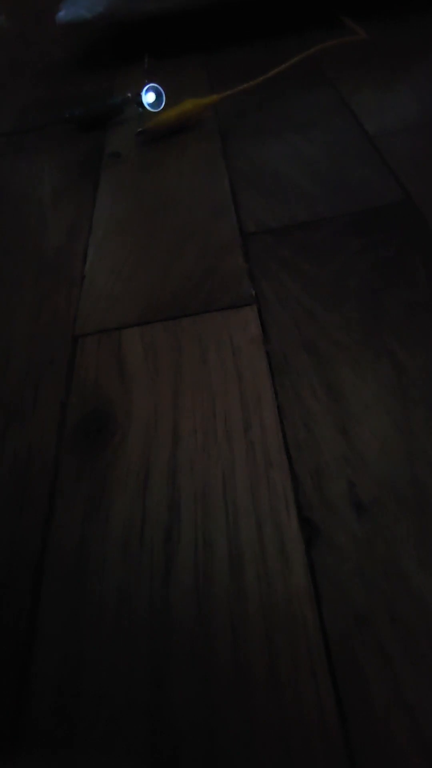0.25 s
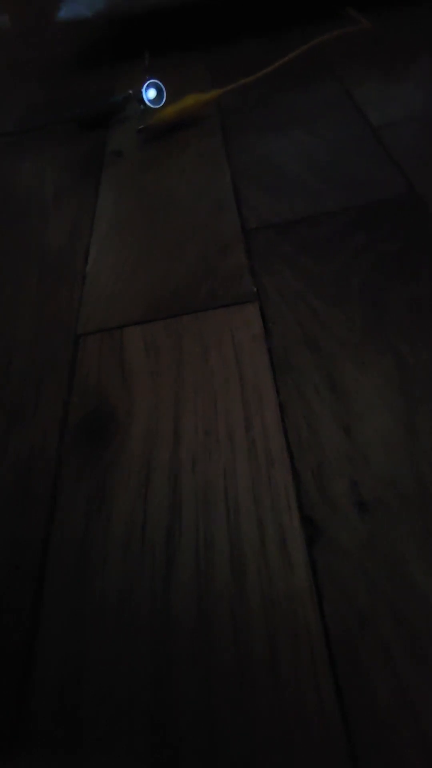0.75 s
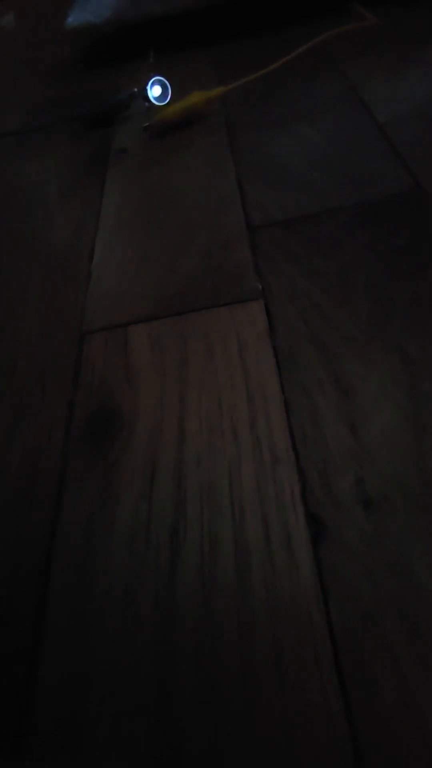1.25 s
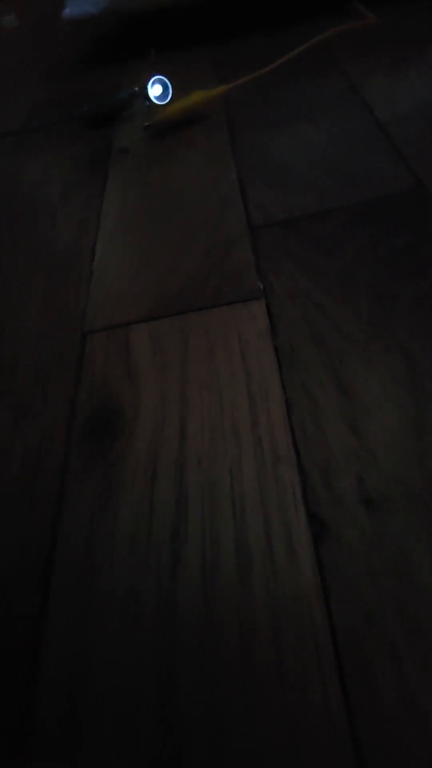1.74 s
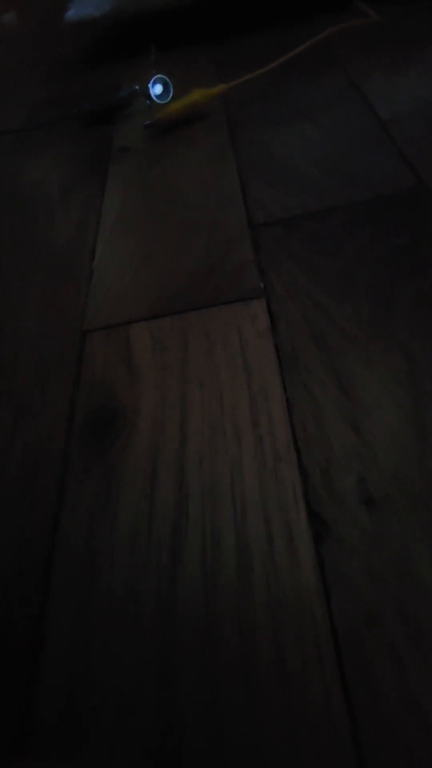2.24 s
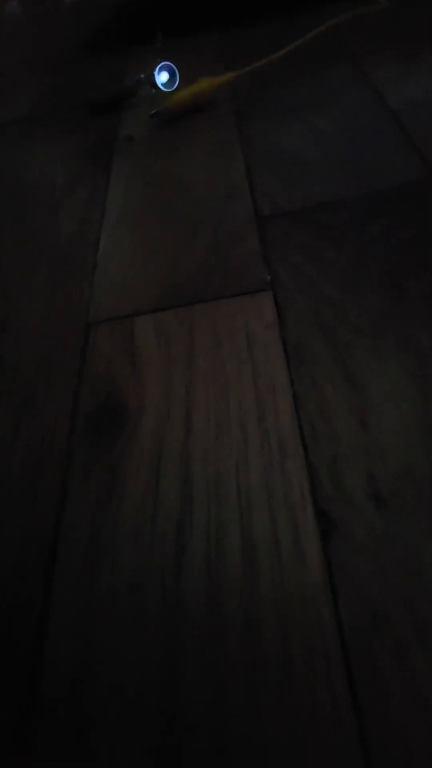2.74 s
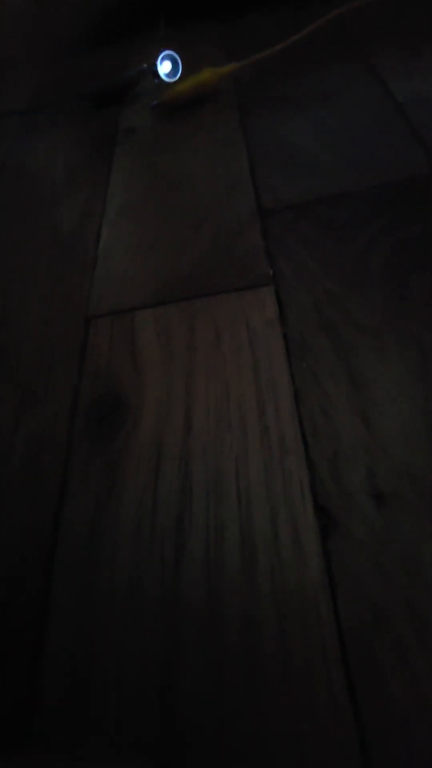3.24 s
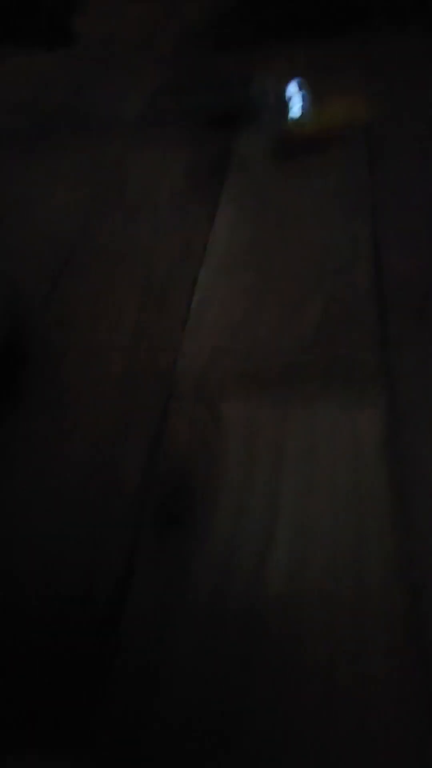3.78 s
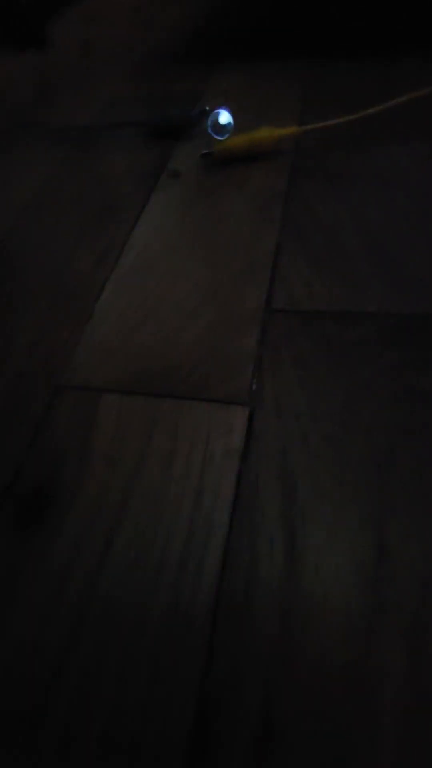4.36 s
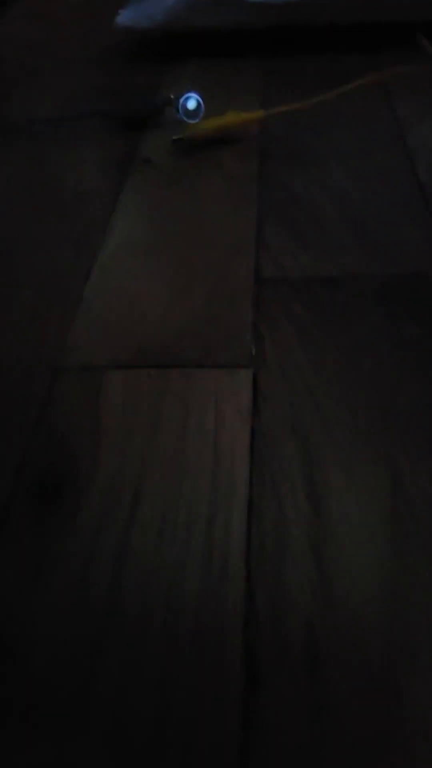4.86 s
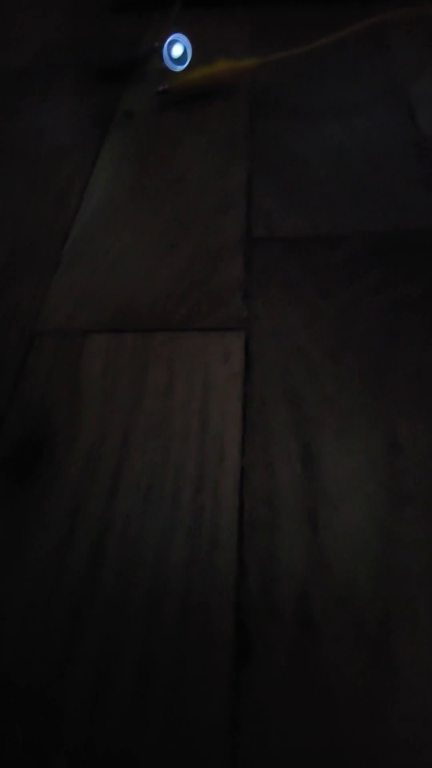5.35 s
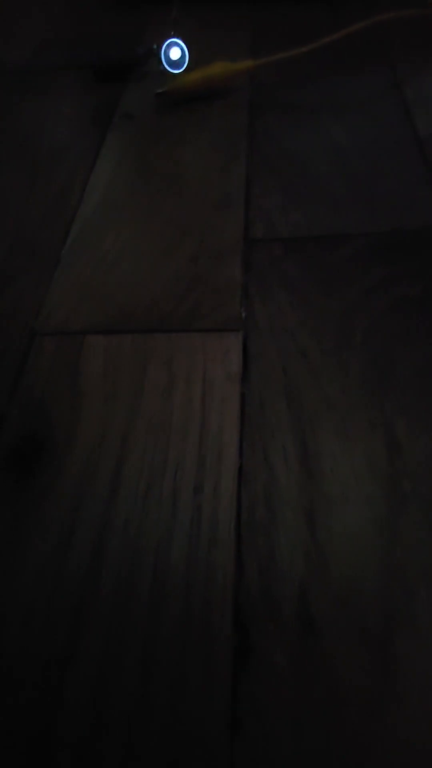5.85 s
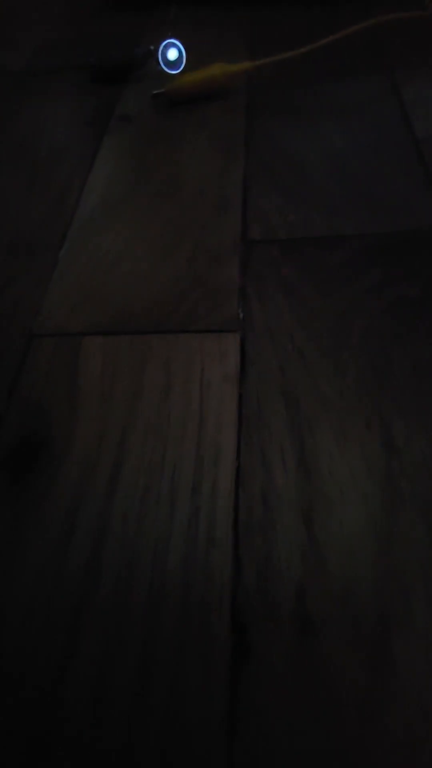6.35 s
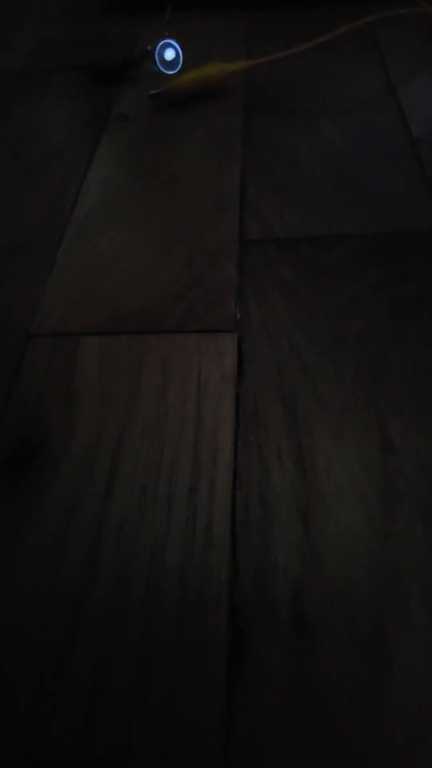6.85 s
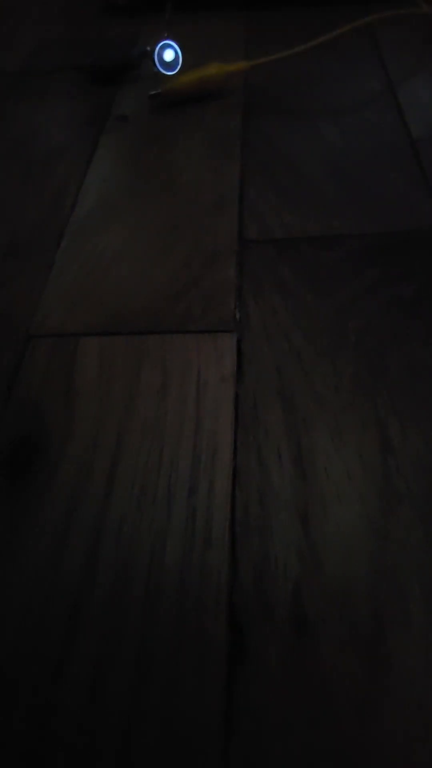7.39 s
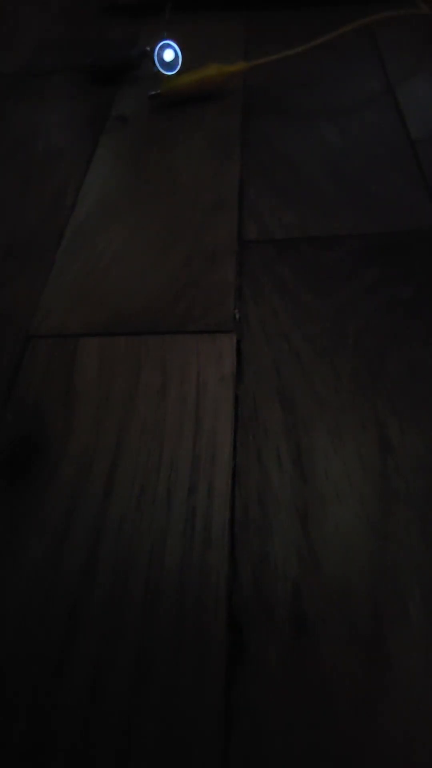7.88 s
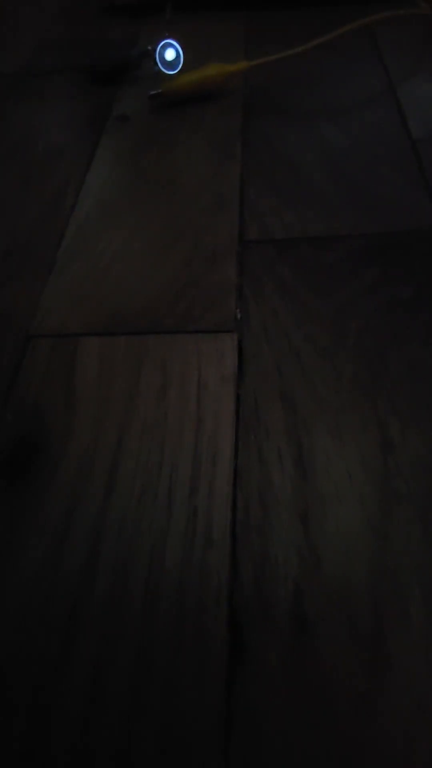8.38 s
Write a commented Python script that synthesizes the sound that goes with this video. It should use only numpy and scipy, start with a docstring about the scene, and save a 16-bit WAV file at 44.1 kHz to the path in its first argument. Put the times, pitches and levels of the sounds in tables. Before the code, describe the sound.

A quiet room with faint hiss and low hum; light crinkly ticks, fumbling on the device, then two hard knocking snaps amid dry rustles.

```python
"""A quiet room, heard at a hand-held camera with two microphone ports, a sheet of thin metal foil shaken close
by. The foil, left of centre, snaps as bursts of banded noise and rustles as clumps of tiny clicks; a few of the
same bursts give blows on the case their sharp edge. On the right, fingers slide over the case (shaped noise)
and knock it (decaying modes); two hard jolts thump it. Far off a motor appliance hums, steady tones over a low
rumble, and a faint hiss lies under everything."""
import sys
import numpy as np
from scipy import signal
from scipy.fft import rfft, irfft, next_fast_len
from scipy.io import wavfile
from scipy.ndimage import uniform_filter1d, map_coordinates

SR = 44100
rng = np.random.default_rng(int(sys.argv[2]) if len(sys.argv) > 2 else 0)


def generate_wav(signal):
    """Clip the signal to [-1, 1] and save it as 16-bit WAV at the path in sys.argv[1]."""
    frames = np.transpose(np.atleast_2d(signal))
    scaled = np.clip(frames, -1, 1) * 32767
    pcm = np.round(scaled).astype(np.int16)
    wavfile.write(sys.argv[1], SR, pcm)


N = 380141  # samples

# In every table a positive pan_db leans left; spectra are relative, their overall level is set elsewhere.
# Hiss of room and microphones: pitch_hz, relative_db per Hz; then its side: pitch_hz, pan_db
HISS_SPECTRUM = [(400, -32.5), (640, -4), (800, -12), (2290, -14.5), (3770, -21), (7500, -26),
                 (8300, -41.5), (10200, -36), (11400, -24), (13100, -20), (15700, -27.5), (16600, -45.5)]
HISS_PAN = [(700, -8), (1300, -4.5), (2400, 4), (4400, 0.5), (8000, 15.5), (15000, 9)]

# Far appliance, tones at multiples of the shaft speed: multiple, level_db (rms)
SHAFT_TONES = [(1, -67.5), (2, -54), (3, -58), (4, -82), (5, -71), (8, -69), (10, -84.5)]
# Its tones off those multiples: pitch_hz, level_db (rms)
OTHER_TONES = [(61.5, -66), (64.5, -71.5), (77.4, -77.5), (90.7, -71.5), (120, -79.5)]
# Its rumble: pitch_hz, relative_db per Hz; then left-right likeness: pitch_hz, likeness (0-1)
RUMBLE_SPECTRUM = [(18, -50), (30, -7.5), (55, 1), (90, 9.5), (130, -3), (250, -6), (400, -12.5),
                   (640, -21.5), (1200, -48)]
RUMBLE_LIKENESS = [(60, 0.756), (290, 0.94), (700, 0.18), (1500, .1)]
SHAFT_HZ = 29.228

# Taps on the case: start_s, level_db (before the modes' own), pitch_hz (favoured by the spot), pan_db
TAPS = [(1.407, -37.5, 1410, -7), (1.6445, -31, 600, -3), (2.717, -50.5, 860, -9), (3.308, -41.5, 500, -4),
        (3.493, -53.5, 560, -16), (3.692, -24.5, 940, -5.5), (3.790, -28.5, 825, -9),
        (3.853, -39.5, 180, 1), (4.1398, -24.5, 900, -8.5), (4.1425, -11.5, 990, -6.5),
        (4.1462, -20, 740, -4), (4.164, -40, 490, -10), (4.2004, -36.5, 1260, -11.5),
        (5.313, -27.5, 997, -9), (5.504, -49.5, 750, -5.5), (6.620, -22.5, 487, 0),
        (6.6293, -16, 472, -1.5), (6.689, -33, 680, -13)]
# Modes of the shell: pitch_hz, relative_db, t60_s
SHELL_MODES = [(178.9, 0.5, .12), (493, -7, 0.033), (620, -2.5, 0.036), (830, 4, 0.016), (943, 4.5, 0.027),
               (1155, 0, 0.01)]
# Jolts of the whole camera: start_s, level_db (before decay and onset),
# pitch_hz (the swing starts at 1.36 times this and sinks towards 0.11 times), t60_s, pan_db
CAMERA_JOLTS = [(1.647, -41.5, 156, 0.13, 2), (4.1423, -9, 138, 0.046, -6.5), (4.1658, -30, 114, 0.15, -6),
                (5.314, -40.5, 261, 0.1, 0), (6.6167, -26, 180, 0.11, 2), (6.6303, -15.5, 219, 0.05, 2),
                (6.688, -35, 200, 0.037, -7)]

# Fingers sliding on the case, one table a rub: time_s, scrape_db, hiss_db
RUBS = [
    [(2.25, -73, -99), (2.4, -68, -99), (2.65, -70.5, -99), (2.8, -69, -99)],
    [(3.475, -92, -99), (3.495, -54.5, -99), (3.53, -69, -99)],
    [(3.65, -68, -99), (3.71, -54, -48), (3.8, -45.5, -50), (3.86, -53, -58.5), (3.89, -52.5, -83),
     (3.96, -51, -62), (4.06, -54.5, -54.5), (4.13, -49.5, -56.5), (4.16, -43.5, -51.5), (4.2, -53, -55),
     (4.235, -61.5, -75), (4.32, -76, -100)],
    [(4.4, -78.5, -97), (4.5, -55.5, -65), (4.56, -55, -53.5), (4.65, -54, -60), (4.72, -62, -65),
     (4.8, -55, -62.5), (4.92, -56.5, -53.5), (4.97, -56.5, -63.5), (5.03, -58.5, -56.5), (5.15, -59, -68),
     (5.26, -66.5, -69), (5.42, -70, -80)],
    [(6.6, -71, -89.5), (6.62, -37.5, -86.5), (6.672, -47, -71), (6.7, -49, -52), (6.8, -89, -79.5)],
    [(7.95, -85, -99), (8.2, -77, -99), (8.62, -79.5, -99)],
]
# Scrape through the shell, then airy hiss of skin: pitch_hz, relative_db per Hz
SCRAPE_SPECTRUM = [(65, -31), (110, 0), (235, 3.5), (333, -2.5), (520, -0.5), (1000, -15), (1350, -27),
                   (2400, -61)]
SKIN_SPECTRUM = [(440, -31.5), (750, -1.5), (1060, -1.5), (1690, -10), (2310, -12), (2700, -15.5),
                 (7400, -14.5), (8870, -28.5), (11500, -14.5), (14700, -15), (15900, -24.5), (16500, -43)]
# Side of the rubbing: pitch_hz, pan_db
RUB_PAN = [(100, -2.5), (400, -9), (1300, -11), (4400, -11), (8000, -0.5), (15000, -6)]
# Hollows between hand and shell, pitch moving with the grip: width_hz, path of (time_s, pitch_hz)
HAND_HOLLOWS = [ (170, [(3.72, 800), (3.8, 770), (3.84, 570), (3.9, 450), (3.98, 600), (4.07, 480),
                (4.12, 720), (4.5, 560)]), (260, [(4.7, 948)])]
# Their levels, one row a rub, one column a hollow: level_db (over the scrape)
HOLLOW_LEVELS = [(-20, -24), (-16, -19), (-4, -14), (-14.5, -1.5), (-7, -9), (-24, -18)]
# Band of the hiss lifted by the cupped hand: time_s, pitch_hz
CUP_PATH = [(4.2, 2312), (4.7, 2390), (4.92, 3640), (5.1, 2330)]
CUP_WIDTH_HZ, CUP_DB = 800, 1

# Flicks of the wrist: start_s, level_db (of the rustle), hold_s
FLICKS = [(1.404, -49, 0.0091), (1.501, -63, 0.081), (1.652, -46.5, .004), (1.684, -70, 0.044),
          (1.818, -64.5, 0.0048), (1.897, -62.5, 0.023), (1.986, -68, .03), (2.09, -66.5, 0.028),
          (2.19, -70.5, 0.031), (2.272, -69.5, 0.057), (2.382, -58.5, 0.016), (2.46, -63.5, 0.012),
          (2.542, -64.5, 0.022), (2.63, -63, 0.0271), (5.08, -64, 0.061), (5.495, -67.5, 0.046),
          (5.694, -67.5, 0.013), (6.572, -67.5, .015), (6.619, -40, 0.015), (6.68, -45.5, 0.0077),
          (6.734, -70.5, 0.021), (6.795, -63.5, 0.0075), (6.895, -69.5, 0.031), (7.2, -70.5, 0.012),
          (8.019, -66, 0.0085)]
# Rustle of the foil: pitch_hz, relative_db per Hz; then its side: pitch_hz, pan_db
FOIL_SPECTRUM = [(410, -17), (700, 0), (1190, -5), (1510, 3), (2430, -3.5), (3040, -4), (4700, -8.5),
                 (7270, -7), (9340, -17), (11700, -2), (15200, -6.5), (16500, -30)]
FOIL_PAN = [(700, -3.5), (1300, -2.5), (2400, 8.5), (8000, 12.5), (15000, 1)]
FLICK_RISE_DB_PER_S, FLICK_FALL_DB_PER_S = 903, 431
DENSE_DB = -44  # flicks harder than this crease so densely that the clicks merge

# Cracks, mostly foil facets that buckle, a few the sharp edge of blows on the case (such as 4.1432 and 5.3137):
# start_s, level_db (before the band strengths), size (0 small - 1 large), pan_db
CRACKS = [(0.039, -54, 0.63, 2), (0.843, -47, 0, 10), (1.072, -59, 0.1, 12), (1.0824, -50, 0.1, 8),
          (1.263, -48.5, 0.38, 6.5), (1.311, -58, 0, 5), (1.321, -54.5, 0.55, 12),
          (1.381, -41.5, 0.53, 6), (1.394, -39.5, 0.4, 2), (1.404, -39, 0, -2),
          (1.4085, -35.5, 0.91, 13.5), (1.4425, -48, 0.96, 5), (1.5007, -39.5, 0.64, 1.5),
          (1.5393, -40.5, 0.53, -2), (1.5798, -42, 0.55, 4), (1.6248, -53, 0.4, 1),
          (1.6454, -23, 0.79, 2.5), (1.822, -59, 0.99, 10), (1.905, -53, .4, 7),
          (1.914, -47.5, 0.43, 2), (1.9334, -49, 0.55, 2), (2.007, -63, 1, 7), (2.0301, -51, 0.54, 4),
          (2.115, -47, 0.54, 0), (2.1179, -53, 0.56, 3), (2.185, -62, 0.97, 10),
          (2.213, -55.5, 0.9, 5), (2.285, -67, .9, 4), (2.3143, -52, 0.4, 4), (2.3886, -33.5, 0.53, 3),
          (2.481, -50.5, 0.6, 5), (2.4933, -53, 0.4, 1), (2.591, -47.5, 0.15, -1),
          (2.627, -51.5, 0.45, 5), (2.7237, -57.5, 0.78, 9), (3.5441, -60.5, 0.89, 27),
          (3.6918, -50.5, 1, -14), (3.7144, -47, 0.94, 23), (3.7916, -47, 0.9, 7),
          (4.1432, -12.5, 0.6, 6.5), (4.1475, -28.5, 0.5, 6), (5.031, -52, 0.46, 18),
          (5.085, -52, 0, 11), (5.1123, -41, 0.5, 7.5), (5.217, -42, 0.6, 4.5),
          (5.2318, -43.5, 0.47, 8.5), (5.3137, -50, 0.96, -7), (5.4379, -57.5, 0.57, 7.5),
          (5.478, -57, 0.55, 11.5), (5.514, -41.5, 0.17, 8), (5.6678, -55.5, 0.5, 10),
          (5.6894, -48.5, 1, 6), (5.703, -51, 0.6, 7.5), (6.5879, -50, 0.6, 16),
          (6.593, -41, 0.6, 8.5), (6.6205, -25.5, 0.8, 0), (6.627, -27.5, .35, -1),
          (6.6325, -28, .6, 11), (6.6867, -28, 0.93, 10.5), (6.8058, -49, 0.5, 12),
          (6.8674, -50.5, 0.57, 7.5), (6.8994, -53, 0.68, 10), (6.92, -49.5, 0.3, 8),
          (6.9491, -54.5, .1, 5), (6.9718, -54, 0.61, 10), (7.0388, -55.5, 0.61, 13),
          (7.1973, -57, 0.77, 18), (7.2475, -44.5, 0.1, 4.5), (7.327, -63.5, 0.45, 15.5),
          (7.3905, -52.5, 0, 6.5), (7.46, -57.5, 0.3, 10), (7.47, -60, 0.8, 7),
          (7.5661, -61, 0.64, 18), (7.962, -66.5, 0.76, 9), (8.0252, -49, 0.98, 10.5),
          (8.0907, -59.5, 0.05, 10), (8.221, -56.5, 0.08, 10.5)]
# Brief ring of large facets: multiple (of the body pitch), level_db (over the room's answer, at size 1), t60_s
FACET_RING = [(1, 9.5, .024), (1.95, 8, .015)]
# Strength of a crack's low, middle and high band: level_db (before the facet's size)
CRACK_BANDS = [20, 14.5, 21]
# Fading of the room's answer in those bands: t60_s
ROOM_FADES = [0.047, 0.06, 0.05]
# Colour of the microphone ports, laid on the snaps: pitch_hz, gain_db
PORT_COLOUR = [(5400, -2), (7500, 4), (9200, -6.5), (11500, -2.5), (15600, -5), (16500, -13.5)]
# lows of the smallest facet, treble of the largest, how late the treble goes as size grows (exponent)
SMALL_LOW_DB, LARGE_HIGH_DB, DULLING = -27, -20.5, 3.5
BODY_HZ, BODY_SINKS = 2226, 0.038  # body pitch of a soft crack, octaves lower per dB of force
BODY_WIDTH, BODY_WIDENS = 1.15, 0.041  # half width as a ratio, added upwards per dB of force

LEAD = 20  # samples by which the left port hears close sounds first
TOP_HZ = 16800  # band limit of the camera


def amp(db):
    """Decibels to gain."""
    return 10 ** (np.asarray(db) / 20)


def unit(x):
    """x at rms 1."""
    return x / np.sqrt(np.mean(x ** 2) + 1e-20)


def along(points, hz):
    """Reads (pitch_hz, value) points on a log axis."""
    f, v = np.transpose(points)
    return np.interp(np.log(hz + 1), np.log(f + 1), v)


def wobble(rate):
    """A smooth random curve, rate knots a second."""
    knots = rng.standard_normal(int(N * rate / SR) + 4)
    return map_coordinates(knots, [np.arange(N) * rate / SR])


def filtered(x, response):
    """x times a response of frequency."""
    m = next_fast_len(N + SR // 4)
    return irfft(rfft(x, m) * response(np.fft.rfftfreq(m, 1 / SR)), m)[..., :N]


def sides(pan_db):
    """Splits a left-right difference evenly: half up on the left, half down on the right."""
    return pan_db * np.array([[.5], [-.5]])


def coloured(pair, spectrum, pan):
    """A stereo pair given a spectrum and a left-right balance, at rms 1."""
    return unit(filtered(pair, lambda hz: amp(along(spectrum, hz) + sides(along(pan, hz)))))


def ports(shared, alike, lag):
    """Part of a noise reaches both ports, the right one later by lag; the rest is each port's own."""
    alike = np.clip(alike, 0, 1)
    both = np.array([shared, np.roll(shared, lag, axis=-1)])
    return np.sqrt(alike) * both + np.sqrt(1 - alike) * rng.standard_normal(both.shape)


def late(x):
    """x as the right port hears it, LEAD samples later."""
    return np.pad(x, (LEAD, 0))[:len(x)]


def add(track, s, db, pan_db, sound):
    """Lays a sound into a stereo track at a time, level and side."""
    start = round(s * SR)
    part = track[..., start:start + sound.shape[-1]]
    part += amp(db + sides(pan_db)) * sound[..., :part.shape[-1]]


def patchy(pair, depth_db):
    """The colour of a noise shifts at random, in patches some 260 Hz wide and 50 ms long."""
    z = signal.stft(pair, nperseg=512)[2]
    field = uniform_filter1d(rng.standard_normal(z.shape[1:]), size=3, axis=0)
    field = uniform_filter1d(field, size=9, axis=1)
    return signal.istft(z * amp(depth_db * unit(field)), nperseg=512)[1][:, :N]


def spans(tables, column):
    """One dB value per sample from tables in a row; silent between them."""
    out, t = np.full(N, -140.), np.arange(N) / SR
    for rows in map(np.array, tables):
        inside = (t >= rows[0, 0]) & (t <= rows[-1, 0])
        out[inside] = np.interp(t[inside], rows[:, 0], rows[:, column])
    return out


def moving(pair, width, path):
    """A pair through one resonance whose pitch follows a path in time."""
    hz, t, z = signal.stft(pair, SR, nperseg=512)
    centre, hz = np.interp(t, *np.transpose(path)), hz[:, None]
    damping = (hz * width) ** 2
    resonance = damping / ((centre ** 2 - hz ** 2) ** 2 + damping)
    return signal.istft(z * resonance, nperseg=512)[1][:, :N]


def steady_hiss():
    """Room and microphones hiss: noise independent at each port, its level and colour drifting slightly."""
    noise = patchy(rng.standard_normal((2, N)), depth_db=3.5)
    return amp(-75.5 + 0.6 * wobble(1.0)) * coloured(noise, HISS_SPECTRUM, HISS_PAN)


def appliance():
    """The far motor's tones waver a little in the room, over a broad rumble that swells slowly."""
    t = np.arange(N) / SR
    hum = np.zeros(N)
    for hz, db in [(k * SHAFT_HZ, db) for k, db in SHAFT_TONES] + OTHER_TONES:
        level = amp(db + 0.37 * wobble(1.0)) * np.sqrt(2)
        hum += level * np.sin(2 * np.pi * (hz * t + rng.random()))

    def mid_and_side(hz):
        """Shares of middle and side noise that give the wanted left-right likeness."""
        turn = np.arccos(np.clip(along(RUMBLE_LIKENESS, hz), -1, 1)) / 2
        return amp(along(RUMBLE_SPECTRUM, hz)) * [np.cos(turn), np.sin(turn)]

    mid, side = filtered(rng.standard_normal((2, N)), mid_and_side)
    rumble = amp(-62 + 6.7 * wobble(0.13)) * unit(np.array([mid + side, mid - side]))
    return np.array([hum, np.roll(hum, 8)]) + rumble


def knocks():
    """A tap rings the shell modes, most of all those near the pitch of its spot."""
    out, t = np.zeros((2, N)), np.arange(SR // 4) / SR
    for s, db, spot_hz, pan_db in TAPS:
        ring = np.zeros(len(t))
        for hz, level, t60 in SHELL_MODES:
            off_spot_db = 20 * np.log2(hz / spot_hz) ** 2
            mode_db = level + rng.normal(0, 0.73) - off_spot_db - 60 * t / t60
            ring += amp(mode_db) * np.sin(2 * np.pi * hz * t)
        ring *= 1 - np.exp(-t / 0.00068)  # a fingertip is a soft hammer
        add(out, s - .0003, db, pan_db, np.array([-ring, late(-ring)]))
    return out


def jolts():
    """A jolt of the camera is one swing of air whose pitch sinks as it dies away."""
    out, t = np.zeros((2, N)), np.arange(SR // 4) / SR
    for s, db, hz, t60, pan_db in CAMERA_JOLTS:
        turns = hz * (0.11 * t + 0.87 * 0.0099 * (1 - np.exp(-t / 0.0069)))
        swing = amp(-60 * t / t60) * np.sin(2 * np.pi * turns) * (1 - np.exp(-t / 0.00061))
        add(out, s, db, pan_db, np.array([swing, late(swing)]))
    return out


def strokes():
    """Skin drags unevenly over the case: a low scrape through the shell, the ring of its hollows, an airy hiss."""
    drag = amp(2.2 * wobble(70))
    scrape = patchy(drag * ports(rng.standard_normal(N), 0.5, LEAD), depth_db=2.5)
    scrape = coloured(scrape, SCRAPE_SPECTRUM, RUB_PAN)
    hiss = patchy(drag ** .8 * ports(rng.standard_normal(N), 0.079, LEAD), depth_db=2.5)
    hiss = coloured(hiss, SKIN_SPECTRUM, RUB_PAN)
    hiss = hiss + amp(CUP_DB) * moving(hiss, CUP_WIDTH_HZ, CUP_PATH)
    out = amp(spans(RUBS, column=1)) * scrape + amp(spans(RUBS, column=2)) * hiss
    flat = [(1, 0)]
    rub = coloured(drag * ports(rng.standard_normal(N), 0.48, LEAD), flat, RUB_PAN)
    for (width, path), levels_db in zip(HAND_HOLLOWS, np.transpose(HOLLOW_LEVELS)):
        hollow = unit(moving(rub, width, path))
        raised = [np.add(rows, [0, db, 0]) for rows, db in zip(RUBS, levels_db)]
        out = out + amp(spans(raised, column=1)) * hollow
    return out


def crinkle(rate, bed):
    """Tiny creases, about rate a second, click in clumps over a bed of noise."""
    clumps = amp(3 * wobble(70))
    clicks = (rng.random(N) < rate * clumps / SR) * amp(3 * rng.standard_normal(N))
    crease = signal.windows.hann(round(0.002 * SR))
    envelope = unit(np.convolve(clicks, crease, "same")) + bed * clumps ** .5
    noise = ports(rng.standard_normal(N), 0.13, LEAD) * envelope
    return coloured(patchy(noise, depth_db=3.5), FOIL_SPECTRUM, FOIL_PAN)


def rustle():
    """Each flick makes the sheet crinkle, a hard one densely; at rest it still ticks now and then as it settles."""
    t = np.arange(N) / SR
    flicks = np.zeros(N)
    for s, db, hold in FLICKS:
        rise_db = FLICK_RISE_DB_PER_S * np.maximum(s - t, 0)
        fall_db = FLICK_FALL_DB_PER_S * np.maximum(t - s - hold, 0)
        flicks += amp(db - rise_db - fall_db)
    effort = uniform_filter1d(flicks, size=SR // 25) / amp(DENSE_DB)
    shaken = crinkle(220, .5 + np.clip(effort, 0, 2.5))
    return flicks * shaken + amp(-88.5) * crinkle(5.9, 0)


def snaps():
    """Each crack lasts a few milliseconds and the room answers faintly; most are buckling foil facets, a few
    edge the blows on the case; large facets sound low."""
    out, t = np.zeros((2, N)), np.arange(SR // 6) / SR
    swell = np.exp(-.5 * ((t - .002) / 0.00074) ** 2)  # the crease runs across the facet
    for s, db, size, pan_db in CRACKS:
        size = np.clip(size, 0, 1)
        force_db = np.clip(db + 47.5, 0, 12)
        body_hz = BODY_HZ * 2 ** (-BODY_SINKS * force_db)
        spread = BODY_WIDTH + BODY_WIDENS * force_db
        low_hz = (body_hz / BODY_WIDTH, body_hz * spread)
        middle_hz = (5200 - 3000 * size, 8900 - 3300 * size ** 2)
        bands = [signal.butter(2, hz, "bandpass", fs=SR, output="sos")
                 for hz in (low_hz, middle_hz, (11200, 14700))]

        # the middle band takes the energy that the lows and the treble leave
        low_db, high_db = SMALL_LOW_DB * (1 - size), LARGE_HIGH_DB * size ** DULLING
        middle_db = 10 * np.log10(max(1 - amp(2 * low_db) - amp(2 * high_db), .3))
        shares_db = np.add(CRACK_BANDS, (low_db, middle_db, high_db))

        crack = ports(rng.standard_normal(len(t)), 0.05, 0) * swell
        crack[1] = late(crack[1])
        wet_db = -14.0 - 0.4 * (db + 45.0)  # loud cracks are the near ones, so they are drier
        room = amp(wet_db) * (t > .002) * rng.standard_normal((2, len(t)))
        for band, share_db, t60 in zip(bands, shares_db, ROOM_FADES):
            part = signal.sosfilt(band, crack + room * amp(-60 * t / t60))
            part /= np.linalg.norm(part, axis=1, keepdims=True)
            add(out, s - .0024, db + share_db, pan_db, part)

        ring = np.zeros(len(t))
        for multiple, level, t60 in FACET_RING:
            hz = multiple * body_hz * np.exp(rng.normal(0, .04))
            ring += size ** 3.7 * amp(level - 60 * t / t60) * np.sin(2 * np.pi * hz * t)
        add(out, s, db + wet_db, pan_db, ring[None])
    return filtered(out, lambda hz: amp(along(PORT_COLOUR, hz)))


def scene():
    """From far to near: steady hiss, appliance, the handled case, then the foil and its cracks, some of which
    edge the blows on the case."""
    background = steady_hiss() + appliance()
    handling = knocks() + jolts() + strokes()
    foil_and_edges = rustle() + snaps()
    return background + handling + foil_and_edges


def record(dry):
    """The camera rounds off the very highest peaks and keeps nothing above its band limit."""
    rounded = dry / (1 + np.abs(dry / .97) ** 8) ** (1 / 8)
    return filtered(rounded, lambda hz: hz < TOP_HZ)


dry = scene()
out = record(dry)
generate_wav(out)
```